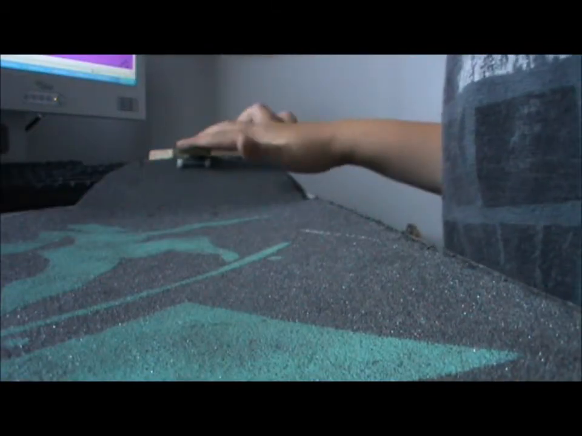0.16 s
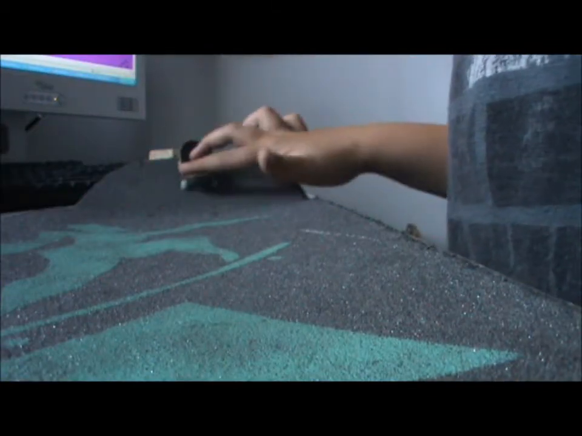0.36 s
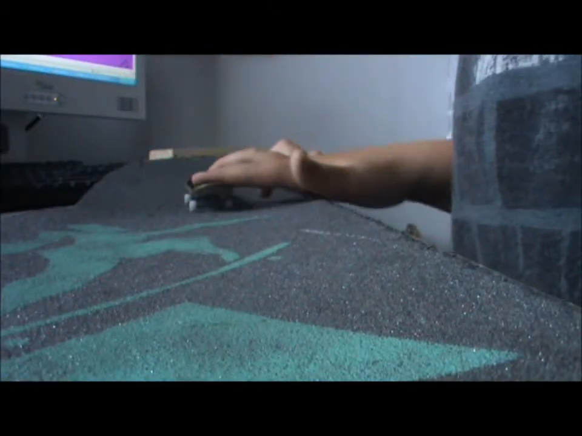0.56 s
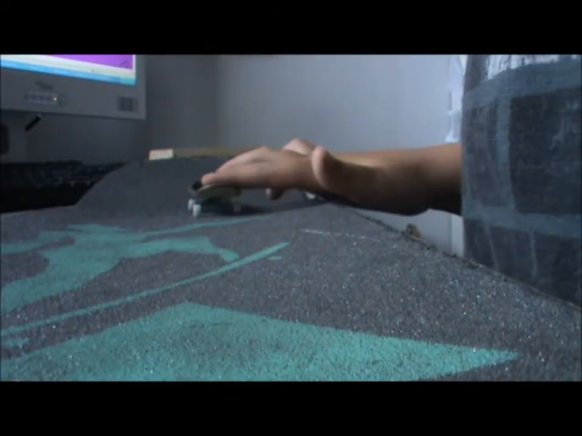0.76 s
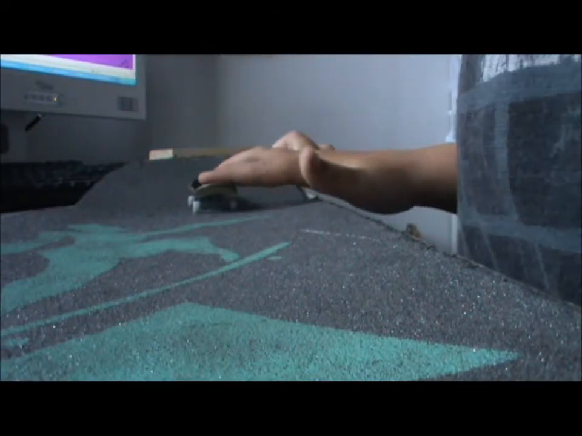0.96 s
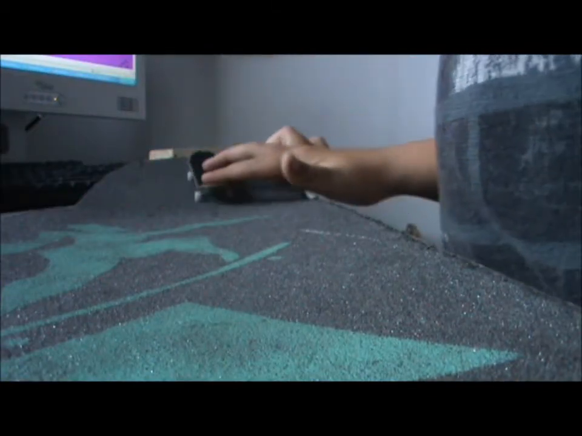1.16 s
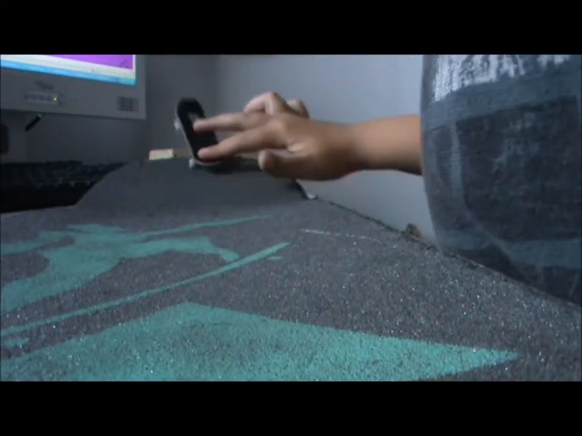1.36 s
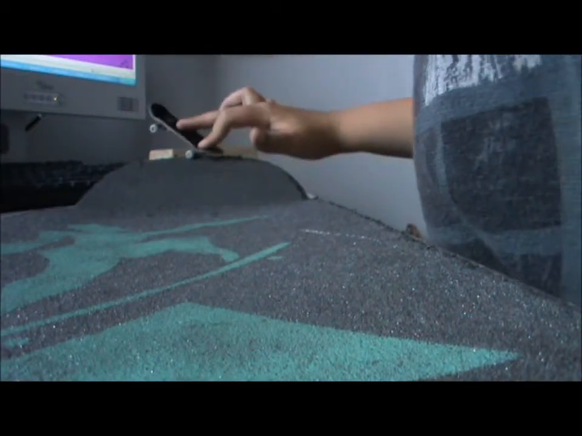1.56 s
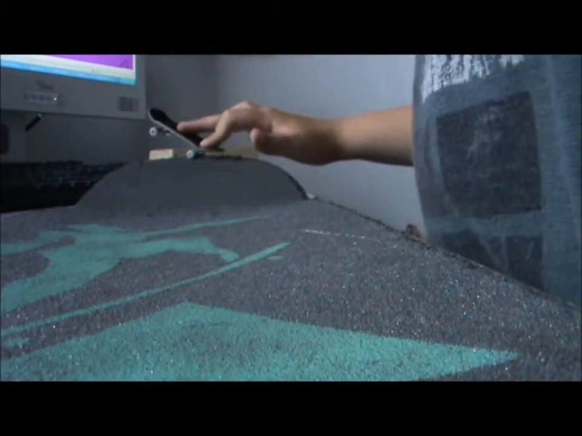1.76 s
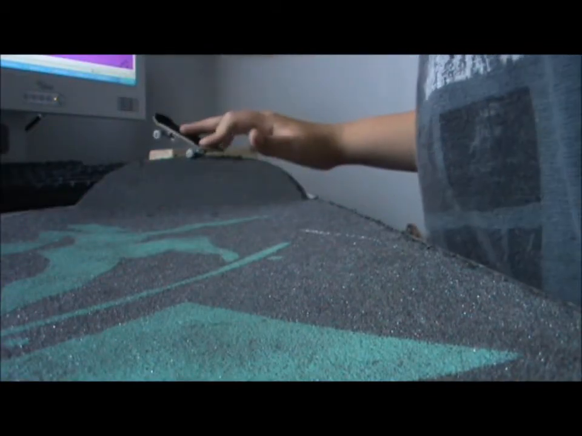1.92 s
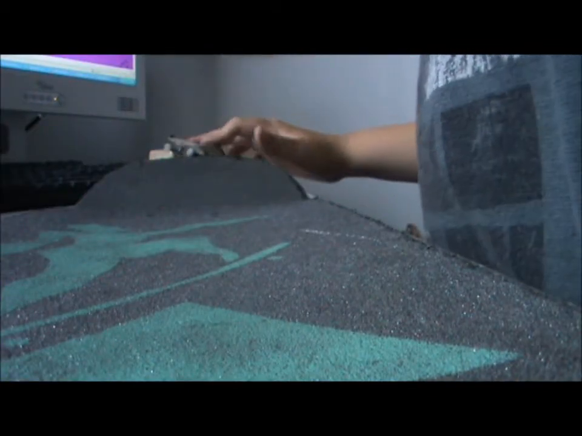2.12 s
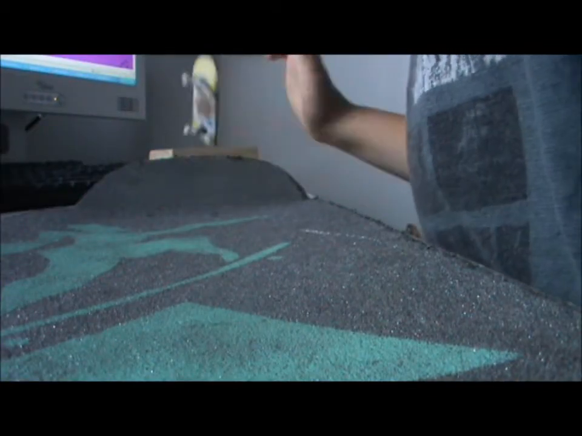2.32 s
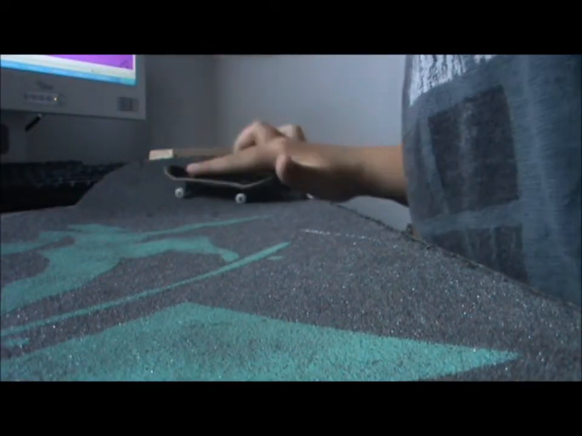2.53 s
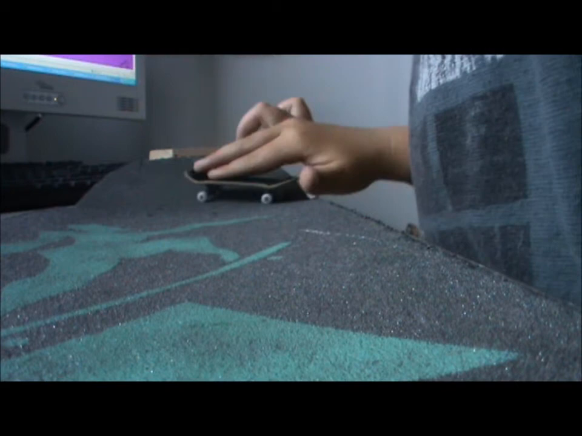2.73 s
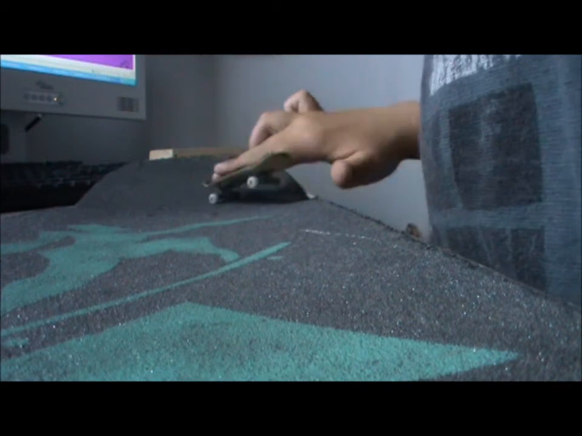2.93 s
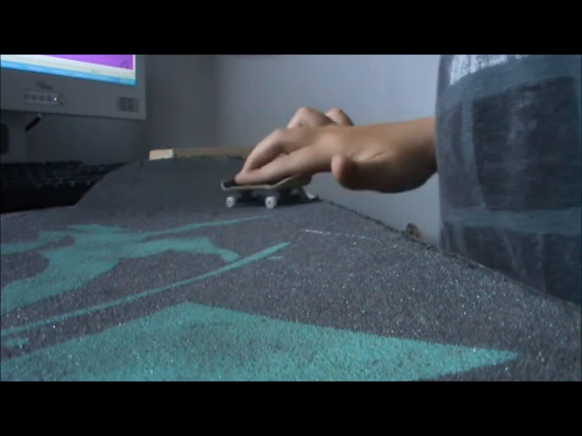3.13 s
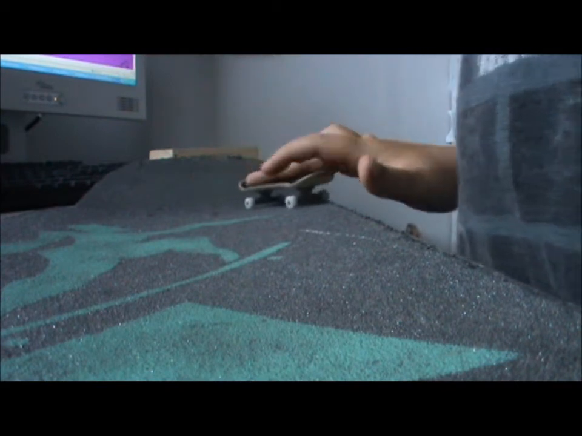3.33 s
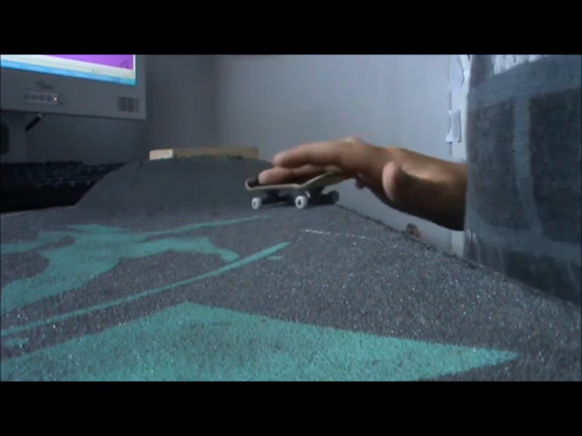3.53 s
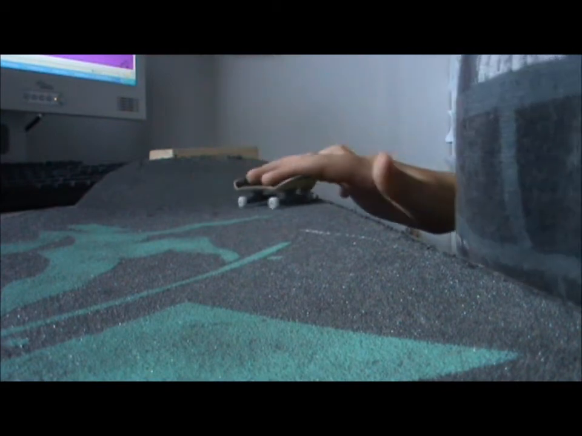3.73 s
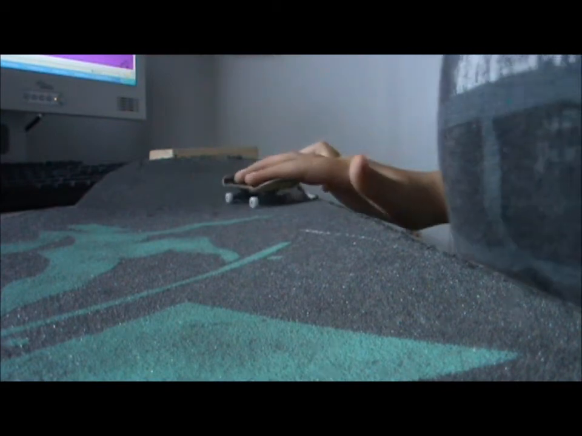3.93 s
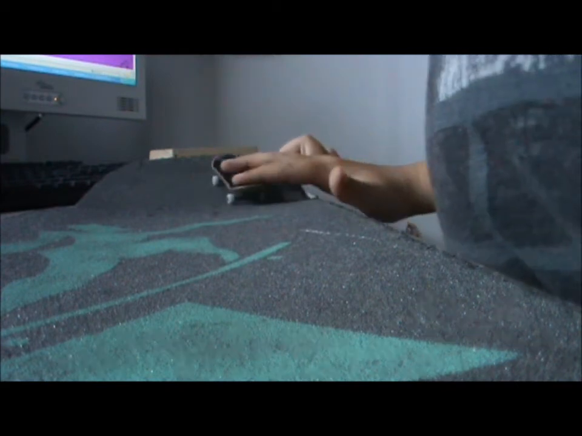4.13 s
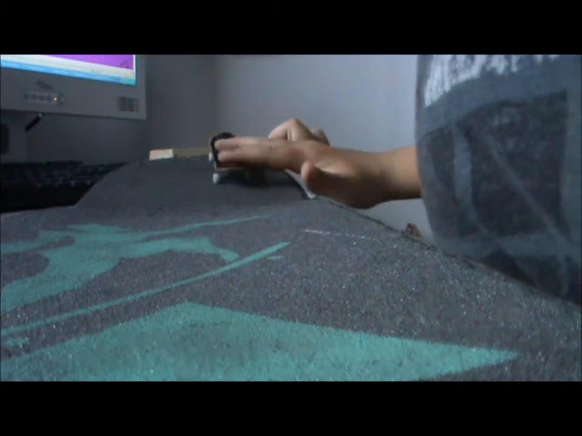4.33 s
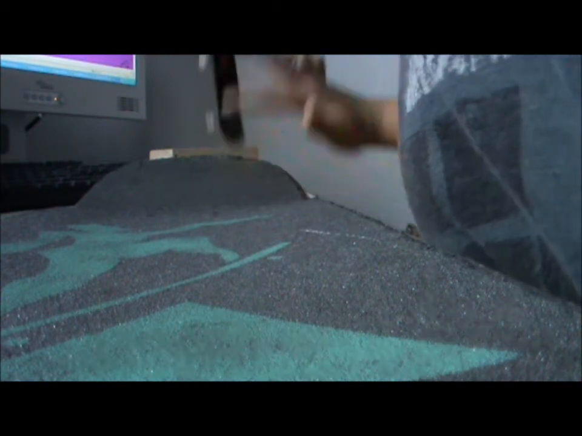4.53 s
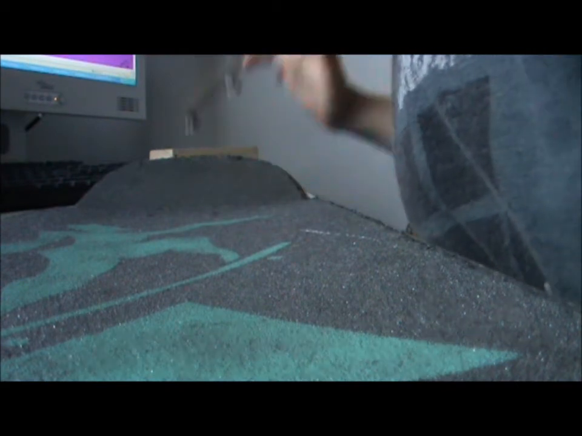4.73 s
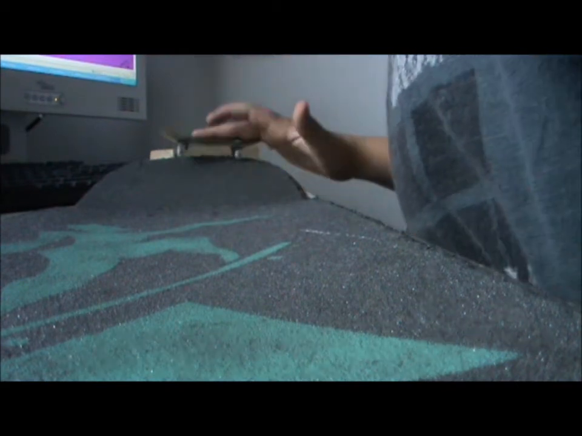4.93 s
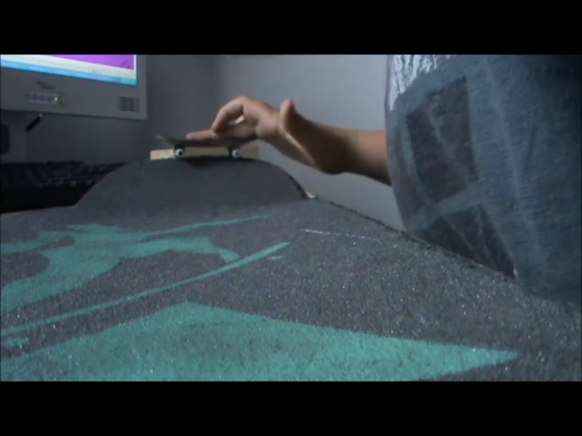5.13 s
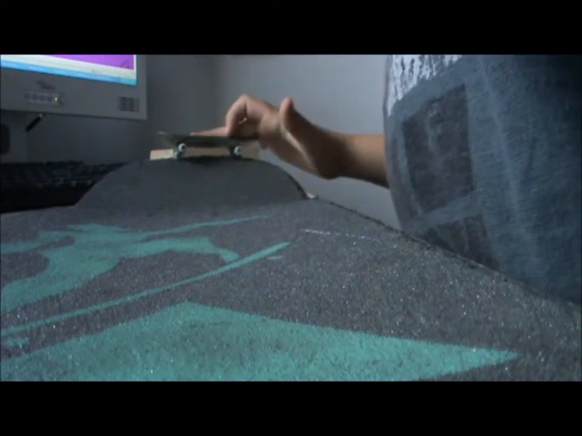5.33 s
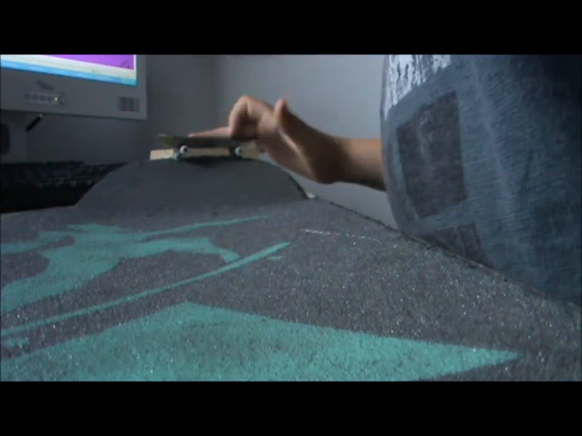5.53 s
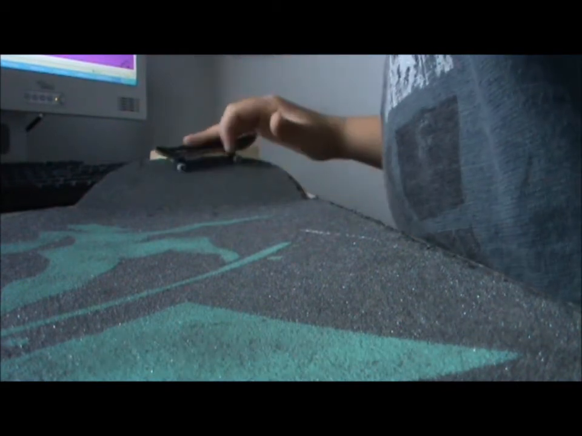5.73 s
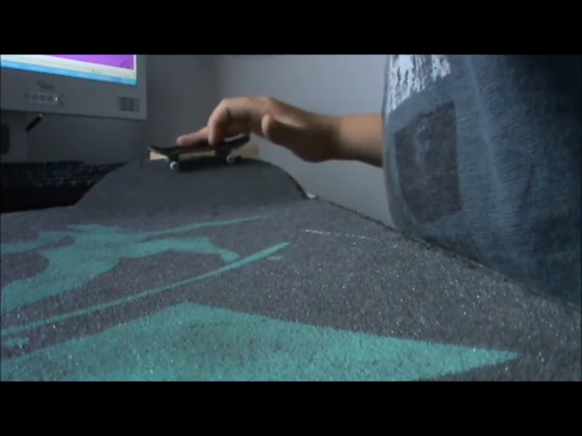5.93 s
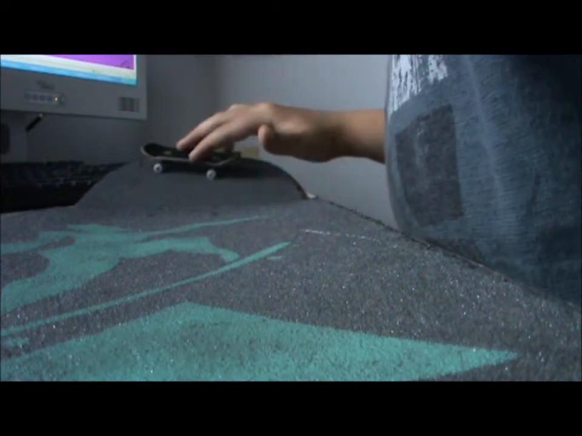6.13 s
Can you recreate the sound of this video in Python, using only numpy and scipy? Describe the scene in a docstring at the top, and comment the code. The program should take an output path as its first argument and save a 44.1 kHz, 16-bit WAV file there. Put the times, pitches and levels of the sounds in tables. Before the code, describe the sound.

In a small bedroom, a finger-driven miniature skateboard scrapes to and fro on a gritty wooden ramp. Gritty rolling and sharp clacks come first, then a near pause with a faint squeak and tiny ping, a hard landing, busy clacking, another flip and booming landing, soft scuffs and taps, and a last roll. The microphones are very close, resting on the same wood, in stereo, with a soft computer fan behind.

```python
"""Small hard wheels hiss and rumble to and fro over a gritty wooden deck, with clacks of flips and landings.
A tiny finger-driven board does it in a small bedroom: random grains, loose-wheel knocks and single blows
shake the deck's resonant modes, and the wheels give off a broad hiss of their own.
Soft scuffs, booming thumps, a faint squeak and one ping join in; the stereo ears rest on the same deck.
Behind are a short duller echo of the room and the faint noise of a computer fan and the room."""
import sys
import numpy as np
from scipy import signal
from scipy.fft import rfft, irfft, next_fast_len
from scipy.io import wavfile
from scipy.ndimage import uniform_filter1d

SR = 44100
rng = np.random.default_rng(int(sys.argv[2]) if len(sys.argv) > 2 else 0)


def linear_from_db(decibels):
    """Turn decibels (scalar or array-like) into linear amplitude factors; 0 gives 1."""
    return 10 ** (np.asarray(decibels, float) / 20)


def to_wav(sig):
    """Store sig (one row per channel, or 1-D mono) as 16-bit WAV at the path in sys.argv[1].

    Samples outside -1..1 are clipped; the rate is SR.
    """
    pcm = np.clip(np.atleast_2d(sig), -1, 1) * 32767
    pcm = np.round(pcm).astype(np.int16)
    wavfile.write(sys.argv[1], SR, pcm.T)  # frames by channels


N = 276507   # length in samples

MIDDLE_HZ, LOW_MIDDLE_HZ = 2100, 600   # middles of the upper and of the low modes
WALL_CUT_HZ = 9000   # the treble is dulled above this in the room


def rms_one(x):
    """Scale to rms 1."""
    return x / np.sqrt(np.mean(x ** 2) + 1e-20)


def at_hz(points, hz):
    """Read a spectrum on a log-frequency axis."""
    point_hz, value = np.transpose(points)
    return np.interp(np.log(np.maximum(hz, 1)), np.log(np.maximum(point_hz, 1)), value)


def drift(rate_hz):
    """Slow random wander of rms 1: noise through two equal low-pass poles, run at 1/40 of the sample rate."""
    r = np.exp(-2 * np.pi * rate_hz * 40 / SR)
    noise = rng.standard_normal(N // 40 + 2002)
    slow = rms_one(signal.lfilter([1], [1, -2 * r, r * r], noise)[2000:])   # skip the start-up
    return np.interp(np.arange(N) / 40, np.arange(len(slow)), slow)


def butter(x, hz, kind):
    """Second-order Butterworth filter."""
    return signal.sosfilt(signal.butter(2, hz, kind, fs=SR, output="sos"), x)


def colour(x, spectrum):
    """Causal (minimum-phase) filter with this spectrum and unit power gain."""
    size = 4096
    cepstrum = irfft(np.log(linear_from_db(at_hz(spectrum, np.arange(size // 2 + 1) * SR / size))))
    # folding the cepstrum onto positive time makes the phase minimal
    cepstrum[1:size // 2] *= 2
    cepstrum[size // 2 + 1:] = 0
    pulse = irfft(np.exp(rfft(cepstrum)))
    pulse = pulse / np.sqrt(np.sum(pulse ** 2))
    return signal.fftconvolve(x, pulse[None], axes=1)[:, :N]


def spread(pair, likeness):
    """Left and right from two unrelated signals, as alike at each pitch as the table says."""
    first, second = rfft(pair)
    alike = np.clip(at_hz(likeness, np.arange(len(first)) * SR / N), -1, 1)
    shared = np.sqrt((1 + alike) / 2) * first
    opposed = np.sqrt((1 - alike) / 2) * second
    return irfft(shared + opposed * [[1], [-1]], N)


def strokes():
    """Rolling gain in time of upper, flex and low modes and hiss; finger load shifts weight to the low end."""
    # Strokes of the wheels, one list each. Each row: time in seconds, level of the upper modes in dB,
    # finger load as low modes over upper in dB.
    stroke_rows = [
        [(0.0, -32, 14.5), (0.05, -37, -2), (0.062, -30.5, 7.5), (0.076, -36, 9), (0.082, -28.5, 5),
         (0.122, -64, -11), (0.16, -64, 23)],
        [(0.25, -42, 12), (0.28, -19, 6), (0.358, -17.5, -9.5), (0.366, -14.5, -6), (0.592, -17.5, 0.5),
         (0.782, -34, 4.5), (0.82, -72, 10)],
        [(0.825, -63, -2), (0.833, -32.5, 2), (0.859, -28.5, 5.5), (1.077, -14.5, -7), (1.085, -21.5, 1.5),
         (1.209, -15.5, -5.5), (1.22, -9, -5)],
        [(1.22, -20, -1.5), (1.408, -15.5, 3.5), (1.45, -35, 4.5), (1.46, -24, 1), (1.634, -62, 13),
         (1.648, -46, 3), (1.68, -72, 14)],
        [(2.47, -22, -19), (2.478, -19, -7), (2.488, -27, -16), (2.51, -12, -0.5), (2.536, -15.5, -8),
         (2.606, -35.5, -4), (2.66, -33, 1)],
        [(2.66, -43, -11), (2.668, -16, -12), (2.676, -25.5, 9), (2.82, -28, -4), (2.834, -30, 2),
         (2.892, -29, 1), (2.97, -83, -9)],
        [(2.985, -49, 1), (3.001, -27, -4), (3.011, -34, 3), (3.037, -29.5, -0.5), (3.155, -24, -0.5),
         (3.273, -28, -0.5), (3.3, -42, 2)],
        [(3.3, -36.5, 4.5), (3.354, -30.5, 4.5), (3.39, -39, 1), (3.398, -37, -6), (3.418, -40, 1),
         (3.426, -43, -1), (3.47, -61, 3)],
        [(3.61, -50, -3), (3.624, -27, 2), (3.644, -28.5, 5.5), (3.666, -21.5, -1), (3.736, -20, 6),
         (3.804, -27.5, 6), (3.95, -24.5, 2)],
        [(3.95, -26.5, 9), (4.018, -14, -9), (4.03, -18.5, -5.5), (4.204, -17.5, 2.5), (4.326, -16, 3),
         (4.43, -45.5, 3), (4.45, -31, 7.5)],
        [(4.77, -35, -18), (4.778, -19.5, -2.5), (4.806, -18.5, -0.5), (4.878, -30, -2), (4.902, -24.5, 8),
         (4.914, -39, -6), (4.955, -53, 4)],
        [(6.0, -28, -12), (6.02, -30, 10.5), (6.038, -18, 2), (6.108, -14.5, -1.5), (6.116, -21, -2),
         (6.138, -13, -2), (6.27, -16, -1.5)],
    ]
    # Short soft scuffs as fingers nudge the board. Each row: middle in seconds, length in seconds,
    # level at the middle in dB, low modes over upper in dB.
    scuff_rows = [(2.149, .05, -32.5, 0), (2.203, 0.1, -33.5, 0), (3.515, 0.097, -33, 2.5),
                  (5.006, 0.083, -23, 0), (5.134, 0.036, -40, -4), (5.306, 0.054, -38.5, 2),
                  (5.369, 0.032, -38, 3), (5.417, 0.05, -37.5, 10), (5.465, 0.022, -36.5, -2),
                  (5.772, 0.12, -34, 3), (5.869, 0.2, -43, 0), (5.959, .03, -38, 3)]
    # deck flex over the upper modes: at a level of -20 dB, per dB of load, per dB of level
    flex_over_db, flex_per_load, flex_per_level = -10, 0.5, -0.28
    hiss_over_db, hiss_per_level = -8, -0.079   # grit hiss over the upper modes, likewise
    level_db, load_db = np.full(N, -90.), np.zeros(N)   # near silence between strokes
    for rows in stroke_rows:
        s, level, load = np.transpose(rows)
        at = np.arange(round(s[0] * SR), min(round(s[-1] * SR), N))
        level_db[at] = np.interp(at / SR, s, level)
        load_db[at] = np.interp(at / SR, s, load)
    for s, length, level, load in scuff_rows:
        at = np.arange(round((s - length / 2) * SR), round((s + length / 2) * SR))
        level_db[at] = level + 20 * np.log10(np.hanning(len(at)) + 1e-3)
        load_db[at] = load
    effort_db = np.maximum(level_db + 20, -35)
    flex_db = flex_over_db + flex_per_load * load_db + flex_per_level * effort_db
    hiss_db = hiss_over_db + hiss_per_level * effort_db
    return linear_from_db(level_db + [np.zeros(N), flex_db, load_db, hiss_db])


def grains(lumpy_db):
    """Front and rear axle each meet grains at random; the ground is lumpy for both at once."""
    grains_per_s, size_spread_db = 4000, 3
    sizes = linear_from_db(size_spread_db * np.minimum(rng.exponential(1, (2, N)), 5))
    signs = rng.choice([-1, 1], (2, N))
    met = rng.random((2, N)) < grains_per_s / SR
    lumps = linear_from_db(lumpy_db * (drift(29.6) + drift(123)))
    return rms_one(sizes * signs * met * lumps)


def rattle():
    """Sparse random knocks of loose wheels, much stronger than a grain."""
    knocks_per_s, knock_db, size_spread_db = 70, 16, 3.5
    sizes = linear_from_db(knock_db + size_spread_db * np.minimum(rng.exponential(1, (2, N)), 3))
    return sizes * (rng.random((2, N)) < knocks_per_s / SR)


def clacks():
    """Each clack is one blow shared by the axles and a dying skid; thumps add a swell of flex."""
    # Clacks of wheels and tail. Each row: time in seconds, strength in dB, low modes over upper in dB,
    # tick over upper in dB, basic skid t60 in seconds.
    clack_rows = [(0.0833, -17.5, -14, -17, 0.041), (0.187, -35, 2, -13, 0.078),
                  (0.2134, -30, -12, -4, 0.049), (0.264, -22, 0, -21, 0.066),
                  (0.2792, -17.5, 1, -14, 0.046), (0.3371, -8, -6, 1.5, 0.06), (0.7462, -24, -2, -4, 0.051),
                  (0.8555, -20, -7, -17, 0.06), (1.4596, -7.5, -5, -10, 0.066),
                  (1.4878, -8.5, -9.5, -2, 0.053), (1.6446, -28.5, -4.5, -1, 0.052),
                  (2.13, -30.5, -5, -7, 0.066), (2.1455, -21, -7, -20, 0.13), (2.2053, -25, 8.5, -4, 0.083),
                  (2.2162, -9.5, 1.5, -19, 0.055), (2.3795, -9.5, 2.5, -13, 0.087),
                  (2.3924, -12, 2.5, -2, 0.14), (2.4267, -0.5, -41, -11.5, 0.18),
                  (2.4656, -3, -29, -11, 0.03), (2.496, -9, -10, -3, 0.039),
                  (2.6656, -8, -3.5, -3.5, 0.045), (2.8346, -7.5, -27, -31, 0.041),
                  (2.9996, -27, -12, -16, 0.066), (3.038, -8.5, -15.5, -11, 0.09),
                  (3.0959, -17, -12, -25, 0.075), (3.1229, -17.5, 0.5, 2.5, 0.084),
                  (3.216, -10, -11, -5, 0.071), (3.245, -10, -30, -16, 0.045),
                  (3.2674, -7.5, -12, 0, 0.053), (3.3972, -18, -1.5, -6, 0.035),
                  (3.4257, -28, -15, 0, 0.047), (3.6214, -14, -9, -16, 0.06), (3.657, -12, -26, -9, 0.042),
                  (3.7607, -5, -37, -15, 0.032), (3.936, -7.5, -26, 0, 0.06), (3.9975, -6, -20, -22, 0.06),
                  (4.4674, -10.5, -3, -7, 0.049), (4.4751, -4.5, -10, 8.5, 0.17),
                  (4.773, -6, -28, -3, 0.06), (4.7957, -9, -12, -17, 0.068), (4.8962, -14, -8, -13, 0.047),
                  (4.9628, -6, -20, -8, 0.074), (4.9854, -14, -10, -1.5, 0.099),
                  (5.0672, -23, 0, -2, 0.087), (5.09, -30, -11, 3, 0.07), (5.1878, -19.5, -3, -12, 0.023),
                  (5.3608, -28.5, -5, -9, 0.082), (5.4109, -23, -3, -24, 0.05),
                  (5.5366, -29.5, -6, -27, 0.036), (5.605, -37, -5, 3, 0.06), (5.668, -9, -13, 0, 0.044),
                  (5.6717, -19.5, 6.5, -14, 0.18), (5.7291, -7, -10, -5, 0.046),
                  (5.7713, -20.5, -2, -3, 0.15), (5.7922, -9, -4, -7, 0.089),
                  (5.9262, -12, -18, -8.5, 0.029), (5.9703, -9, -1.5, -6.5, 0.079),
                  (5.9764, -17.5, -4.5, -4, 0.18), (6.0342, -19, -11, 3, 0.07)]
    # The hand's weight comes down and the deck booms. Each row: start in seconds, level in dB, t60 in seconds.
    thump_rows = [(1.49, -25, 0.17), (2.215, -22, 0.26), (2.38, -28, 0.13), (2.5, -21, 0.5),
                  (4.465, -40, 0.16), (4.781, -15.5, 0.76), (4.897, -22, 0.083), (5.0, -25, 0.26),
                  (5.41, -28, 0.12), (5.79, -37, 0.12)]
    # Each of these three lists runs over upper, flex and low modes and the tick.
    # Gain of the blow's impulse [dB].
    blow_db = [15.6, 29.3, 22.6, 11.7]
    # Gain of the skid [dB].
    skid_db = [-10.5, 4.5, -2.5, -7.5]
    # Share of the basic t60 [ratio]: flex lingers, the tick's rasp dies first.
    t60_share = [1.07, 1.07, 0.93, 0.52]
    flex_over_db, flex_per_low = -15.5, 0.55   # a dull clack flexes the deck more
    thump_rise_s = 0.008
    blows, skids = np.zeros((4, 2, N)), np.zeros((4, N))
    axle_angles = rng.uniform(0.12, 0.62, len(clack_rows))   # rad; sets each axle's share
    for (s, strength_db, low_db, tick_db, t60), angle in zip(clack_rows, axle_angles):
        at = round(s * SR)
        levels_db = strength_db + np.array([0, flex_over_db + flex_per_low * low_db, low_db, tick_db])
        blows[:, :, at] += np.outer(linear_from_db(levels_db + blow_db), [np.cos(angle), np.sin(angle)])
        t = np.arange(min(N - at, SR // 2)) / SR
        fall_db = 60 * np.outer(1 / np.array(t60_share), t / max(t60, 0.005))
        skids[:, at:at + len(t)] += linear_from_db((levels_db + skid_db)[:, None] - fall_db)
    for s, level_db, t60 in thump_rows:
        t = np.maximum(np.arange(N) / SR - s, 0)
        skids[1] += linear_from_db(level_db - 60 * t / t60) * (1 - np.exp(-t / thump_rise_s))
    return blows, skids


def wheel_spot():
    """Where the wheels stand decides which modes they favour: four curves in time."""
    # Each row: time in seconds, favoured upper modes in Hz, favoured low modes in Hz, extra flex in dB,
    # extra grit hiss in dB.
    spot_rows = [(0.0, 1780, 507, 3, -2), (0.28, 2570, 706, 5.5, 0.5), (0.33, 2150, 960, 7, -1.5),
                 (0.61, 1670, 684, -9.5, 0.5), (1.17, 1960, 558, 0.5, -3.5), (1.24, 2140, 930, 3, 0),
                 (1.52, 2330, 544, 1.5, -1), (1.57, 1630, 735, 4, -1.5), (2.01, 2070, 528, -4, -7),
                 (2.16, 2010, 700, 5.5, 8), (2.29, 1760, 446, 1.5, 6), (2.44, 2100, 975, 4, 5),
                 (2.93, 2120, 620, -5, -1.5), (4.7, 2140, 553, 5, -2), (4.75, 2470, 970, 2, 1.5),
                 (4.82, 2520, 482, 1, 5.5), (5.05, 2020, 724, -1.5, -2), (5.97, 2440, 675, 2, 4.5),
                 (6.11, 1620, 660, -1, -1.5), (6.27, 1780, 940, -5, -1.5)]
    s, *columns = np.transpose(spot_rows)
    return [np.interp(np.arange(N) / SR, s, column) for column in columns]


def deck(force, modes, skew, wander_db, favoured_hz=MIDDLE_HZ, middle_hz=MIDDLE_HZ):
    """Each mode feels its own mix of the axles, wandering as the wheels cross its nodes; unit power gain."""
    favour_db = 8   # gain of a mode an octave up when the favoured pitch is an octave up
    near_top_db, near_octaves = 5, 0.13   # extra gain of the modes close to the favoured pitch
    out, power = np.zeros((2, N)), 0
    lean = favour_db * np.log2(favoured_hz / middle_hz)   # dB per octave
    for k, (hz, width_hz, left_db, right_db, lead) in enumerate(modes):
        r, w = np.exp(-np.pi * max(width_hz, 5) / SR), 2 * np.pi * hz / SR
        angle = rng.uniform(0, np.pi / 2)
        near_db = near_top_db * np.exp(-(np.log2(hz / favoured_hz) / near_octaves) ** 2)
        felt_db = wander_db * drift(6.3) + lean * np.log2(hz / middle_hz) + near_db
        felt = force * linear_from_db(felt_db) + 1e-18
        for ear, (ear_db, side) in enumerate([(left_db, 1), (right_db, -1)]):
            gain, phase = linear_from_db(ear_db) * (1 - r) * (-1) ** k, side * lead / 2
            axle_mix = angle + side * skew
            push = np.cos(axle_mix) * felt[0] + np.sin(axle_mix) * felt[1]
            # a damped sine that starts at this phase
            strike = [gain * np.sin(phase), gain * r * np.sin(w - phase)]
            out[ear] += signal.lfilter(strike, [1, -2 * r * np.cos(w), r * r], push)
            power += gain ** 2 / (8 * (1 - r))
    # a small plate radiates little below its lowest mode; rubbery contact dulls it above its highest
    edges_hz = [modes[0][0] / 2, modes[-1][0] * 2]
    return butter(out, edges_hz, "band") / np.sqrt(power)


def wood(upper, flex, low, upper_hz, low_hz):
    """The deck rings in three groups of modes: flex at the bottom, low modes, upper modes."""
    # Modes of the deck. Each row: pitch in Hz, width in Hz, left gain in dB, right gain in dB,
    # lead of the left in rad.
    deck_modes = [(52, 58, -3, -24, -26), (106, 20, -61, -29.5, 4.7), (127.8, 16.6, -4.5, -6.5, 0.28),
                  (164, 22, -11.5, -7, -0.76), (229.3, 37, -5.5, -5, 0.2), (275.6, 29.7, 1, -3.5, 0.44),
                  (325.3, 7.5, -1.5, -3, -5.13), (415, 20, -45, -11, 4), (503.4, 54, 1.5, -6.5, 0.66),
                  (525.3, 25.2, -0.5, -2, -0.17), (630, 39, -16, -3, 0.4), (741, 49, -7.5, -5, -1.06),
                  (775.7, 49, -6, -3.5, 0.63), (977, 57, -2.5, -3, 0.98), (1136, 26, -9, -6, 1.36),
                  (1247, 48, -1, -14, -3.5), (1302, 127, -14, -2, 3), (1511, 62, -0.5, -3, -1),
                  (1590, 63, -2, 5, 0.43), (1676, 140, 1, -24, 0.9), (1937, 430, 6, -9.5, -1.4),
                  (2020, 150, 7, 2.5, -3.1), (2310, 266, -9.5, -24.5, -5), (2600, 96, -20, -17.5, 1.16),
                  (2570, 48, 4.5, -10.5, -4), (2740, 320, -13, -3.5, -1.9), (3000, 18, -77, -6, -4.5),
                  (3010, 470, -6.5, -5.5, 0.76), (3407, 210, -5, -22, 2.8), (3160, 490, -6, -26, 1.7)]
    # Each ear hears its nearer axle more: upper, flex and low modes [rad].
    ear_skew = [0.28, 0.04, 0.19]
    flex_top_hz, low_top_hz = 260, 1200
    upper_modes = [m for m in deck_modes if m[0] > low_top_hz]
    flex_modes = [m for m in deck_modes if m[0] <= flex_top_hz]
    low_modes = [m for m in deck_modes if flex_top_hz < m[0] <= low_top_hz]
    ringing = deck(upper, upper_modes, ear_skew[0], 4.0, upper_hz)
    ringing += deck(flex, flex_modes, ear_skew[1], 2.94)
    ringing += deck(low, low_modes, ear_skew[2], 1.28, low_hz, LOW_MIDDLE_HZ)
    return butter(ringing, 85, "high")   # the deck's ringing is thin below about 85 Hz


def wheel_hiss(force):
    """Grit hisses straight from the wheels: the force in a broad colour, uneven in its upper bands."""
    # Colour of the hiss. Each row: pitch in Hz, relative density in dB per Hz.
    grit_colour = [(1470, -51.5), (2500, -4), (3360, -3), (3780, -2), (4600, -4.5), (5680, -8), (7300, -14),
                   (12100, -21), (15100, -36), (16200, -80)]
    # Stereo image of the hiss. Each row: pitch in Hz, left-right likeness from 0 to 1.
    grit_likeness = [(3000, .3), (8500, .4), (10000, .96), (16000, .97)]
    rasp = spread(colour(force, grit_colour), grit_likeness)
    finest = butter(rasp, 7000, "high")
    coarse = butter(rasp, [3600, 6000], "band")
    rasp = rasp + coarse * (linear_from_db(1.0 + 2.2 * drift(11.8)) - 1)   # coarser grit bites in lumps
    return rasp + finest * (linear_from_db(4.94 * drift(2.5)) - 1)   # the finest grit lies in patches


def board():
    """Grains, knocks, blows and skids drive the deck's modes and the hiss of the wheels."""
    # Strength of a loose-wheel knock in upper, flex and low modes and hiss [dB].
    rattle_over_db = [2.5, -1, 3, -3.5]
    rolling_gain, (blows, skids) = strokes(), clacks()
    upper_hz, low_hz, flex_db, hiss_db = wheel_spot()
    grit = butter(grains(lumpy_db=1.13), 90, "high")   # grains are too light to rock the stand
    knocks = linear_from_db(rattle_over_db)[:, None, None] * rattle()
    rolling = rolling_gain[:, None] * (grit + knocks)
    rubbed = skids[:, None] * rng.standard_normal((2, N))   # a skid meets grains too fast to tell apart
    upper, flex, low, hiss = rolling + rubbed + blows
    return wood(upper, flex * linear_from_db(flex_db), low, upper_hz, low_hz) + wheel_hiss(hiss * linear_from_db(hiss_db))


def squeak():
    """A thin, faint rising tone, slightly unsteady in pitch and level."""
    # Each row: time in seconds, pitch in Hz, level in dB.
    squeak_rows = [(1.76, 2080, -55), (1.796, 2265, -61), (1.968, 2330, -50), (2.03, 2350, -67)]
    s, hz, db = np.transpose(squeak_rows)
    t = np.arange(N) / SR
    pitch_hz = np.interp(t, s, hz) * (1 + 0.004 * drift(30))
    tone = np.sqrt(2) * np.sin(2 * np.pi * np.cumsum(pitch_hz) / SR)
    return tone * linear_from_db(np.interp(t, s, db, left=-120, right=-120) + 2.0 * drift(25))


def ping():
    """A small part rings once: one damped sine."""
    start_s, level_db, pitch_hz, t60_s = 1.8195, -26, 1530, 0.022
    t = np.maximum(np.arange(N) / SR - start_s, 0)
    return linear_from_db(level_db - 60 * t / t60_s) * np.sin(2 * np.pi * pitch_hz * t)


def room(x):
    """Six feedback delays a side, duller on every round."""
    t60_s = 0.29   # before the dulling
    out, dull = np.zeros((2, N)), np.exp(-2 * np.pi * WALL_CUT_HZ / SR)
    size = next_fast_len(N + SR)
    turn = np.exp(-2j * np.pi * np.arange(size // 2 + 1) / size)   # a delay of one sample
    wall, heard = (1 - dull) / (1 - dull * turn), rfft(x, size)
    for ear in range(2):
        echo = 0
        lags = (rng.uniform(0.0086, 0.033, size=6) * SR).astype(int)
        for k, lag in enumerate(lags):
            loop = linear_from_db(-60 * lag / SR / t60_s) * wall * np.exp(np.log(turn) * lag)
            echo = echo + (-1) ** k * loop / (1 - loop)   # all rounds summed
        out[ear] = irfft(heard * echo, size)[:N]
    return out


def floor():
    """Fan and room noise: coloured noise, alike in both ears in the bass, wavering a little."""
    # Colour of the noise. Each row: pitch in Hz, relative density in dB per Hz.
    floor_colour = [(15, -39), (25, -43), (108, 6), (181, -4), (302, 3.5), (386, -6), (479, 4.5), (563, -6),
                    (681, -0.5), (1270, -8), (2010, -7.5), (2500, -9.5), (16200, -30)]
    # Stereo image of the noise. Each row: pitch in Hz, left-right likeness from 0 to 1.
    floor_likeness = [(60, 1), (300, 0.98), (950, 0.73), (3000, 0.43), (8500, 0.42), (10000, 0.88),
                      (16000, .96)]
    level_db = -41 + 1.0 * drift(12)
    noise = colour(rng.standard_normal((2, N)), floor_colour)
    return linear_from_db(level_db) * spread(noise, floor_likeness)


def scene():
    """The board on its deck, its echo in the room, the squeak and ping, and the noise behind."""
    direct = board()
    soft = butter(direct.mean(0), WALL_CUT_HZ, "low")   # bedding swallows the treble
    room_db = -15.5
    return direct + linear_from_db(room_db) * room(soft) + floor() + squeak() + ping()


def limiter(x, ceiling_db, release_db_per_s):
    """Gain drops within a millisecond when the louder ear passes the ceiling, then climbs back."""
    ramp = release_db_per_s * np.arange(N) / SR
    over_db = np.maximum(20 * np.log10(abs(x).max(0) + 1e-9) - ceiling_db, 0)
    held_db = np.maximum.accumulate(over_db + ramp) - ramp
    return x * linear_from_db(-uniform_filter1d(held_db, size=45, origin=10))


def top_cut(x):
    """Nothing passes above the cut-off."""
    return signal.sosfilt(signal.butter(12, 16350, fs=SR, output="sos"), x)


def record(dry):
    """A limiter holds the peaks of the finished mix."""
    mix = limiter(dry, ceiling_db=1.0, release_db_per_s=189)
    return top_cut(mix)


dry = scene()
out = record(dry)
to_wav(out)
```